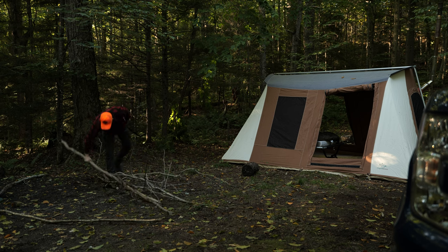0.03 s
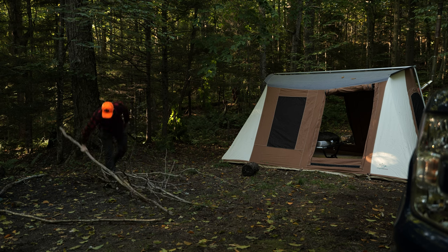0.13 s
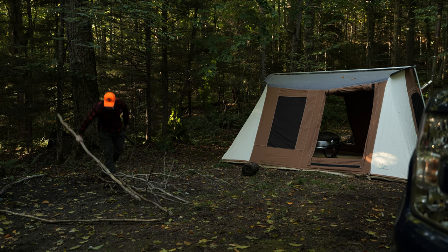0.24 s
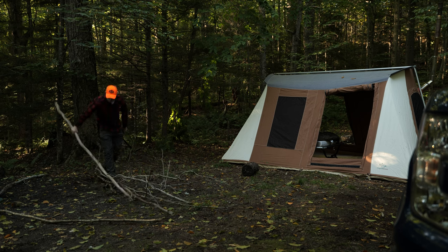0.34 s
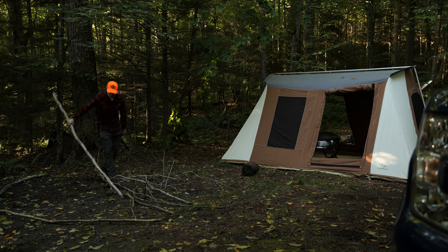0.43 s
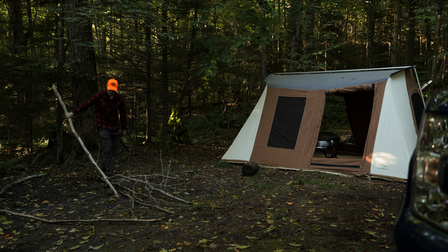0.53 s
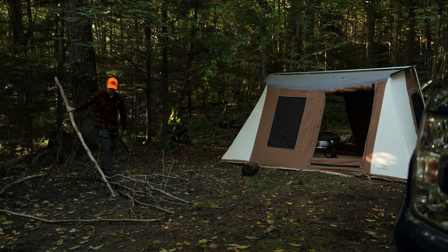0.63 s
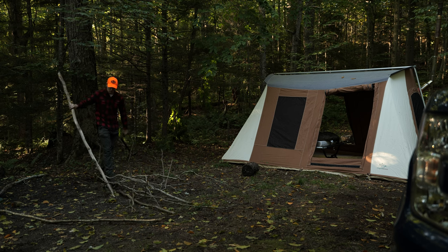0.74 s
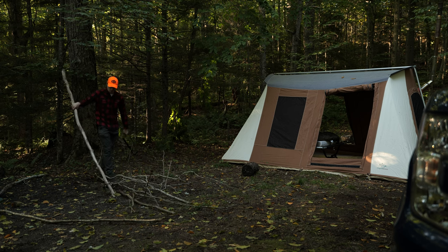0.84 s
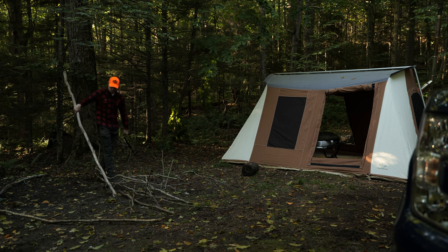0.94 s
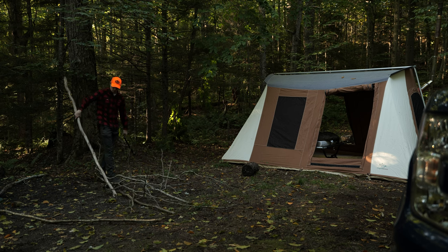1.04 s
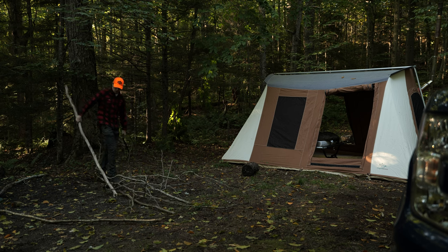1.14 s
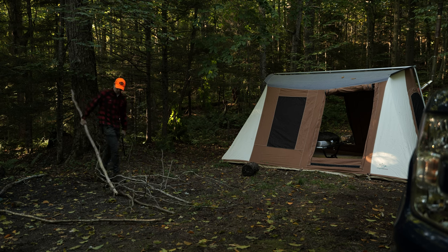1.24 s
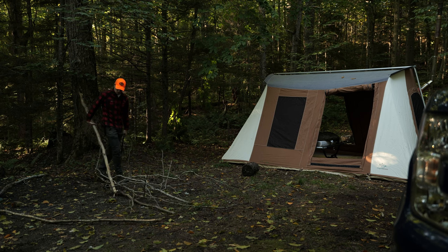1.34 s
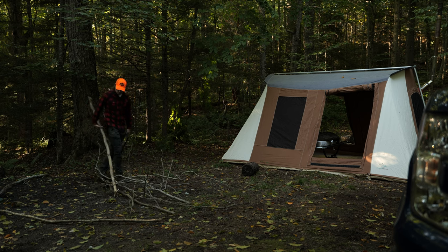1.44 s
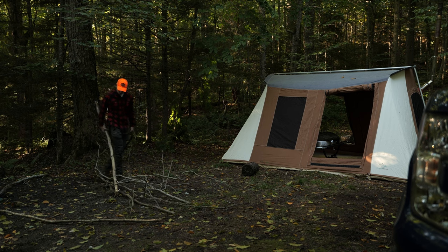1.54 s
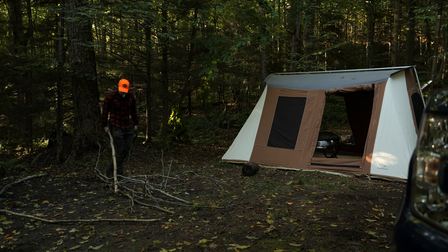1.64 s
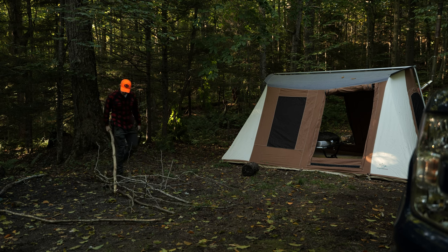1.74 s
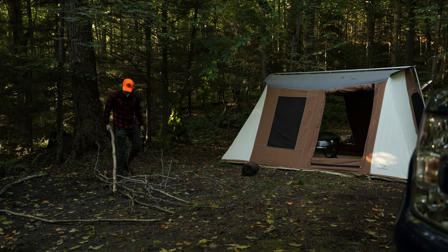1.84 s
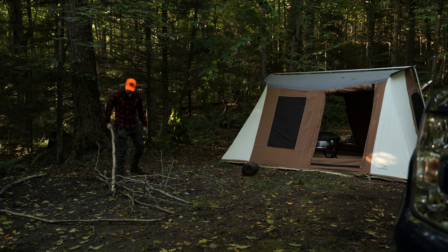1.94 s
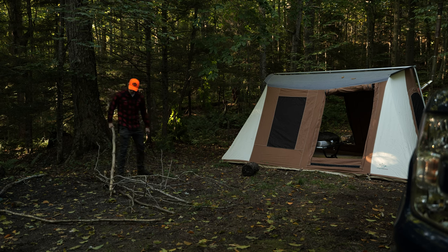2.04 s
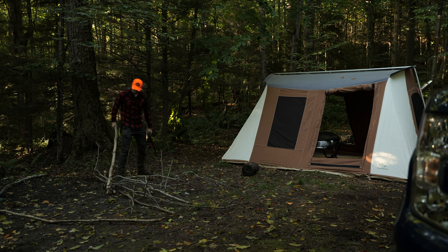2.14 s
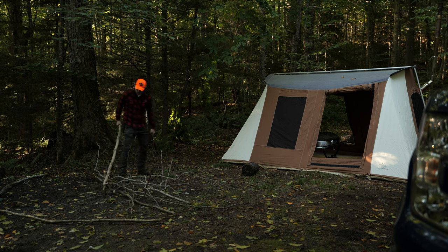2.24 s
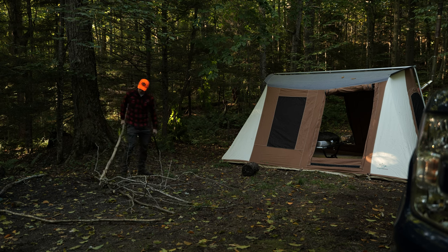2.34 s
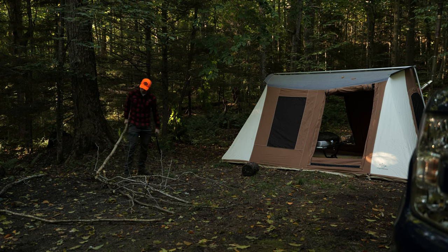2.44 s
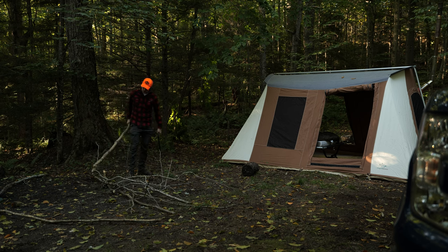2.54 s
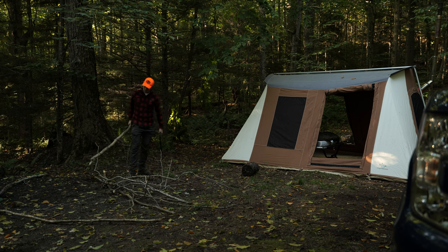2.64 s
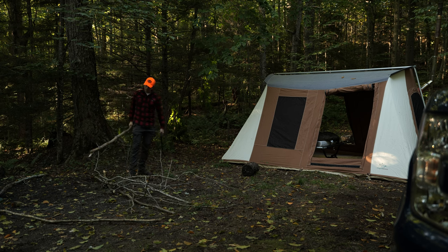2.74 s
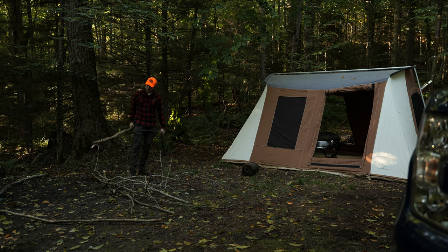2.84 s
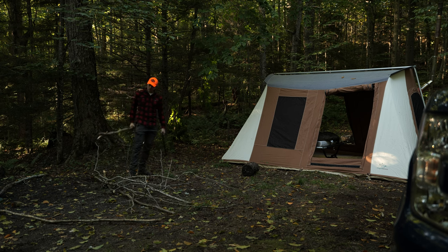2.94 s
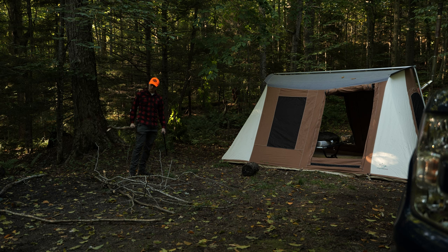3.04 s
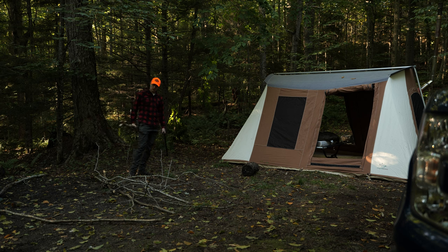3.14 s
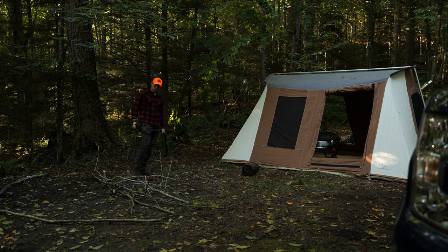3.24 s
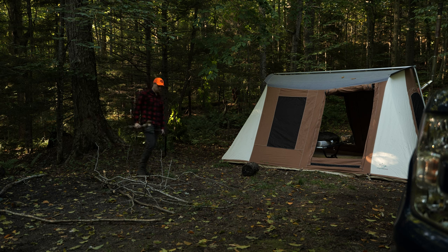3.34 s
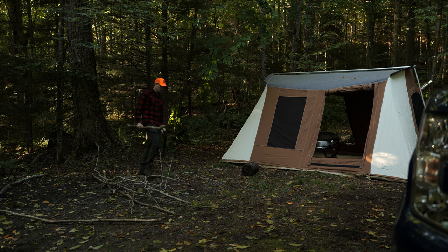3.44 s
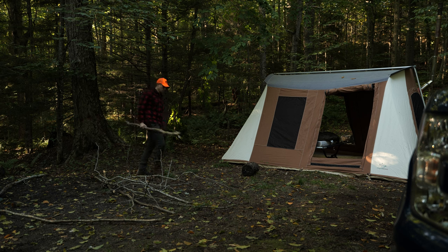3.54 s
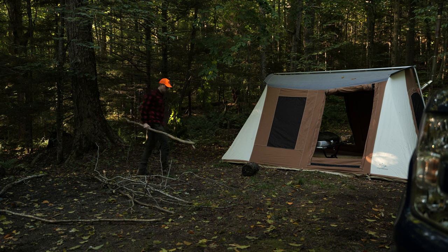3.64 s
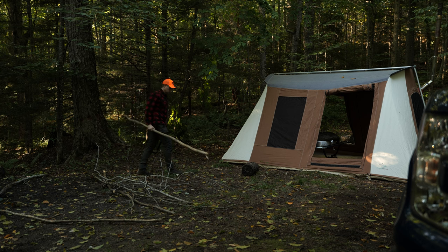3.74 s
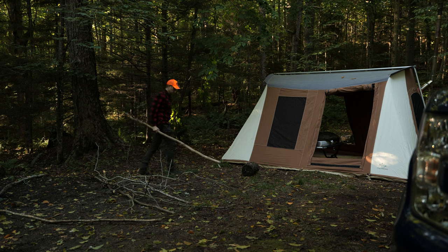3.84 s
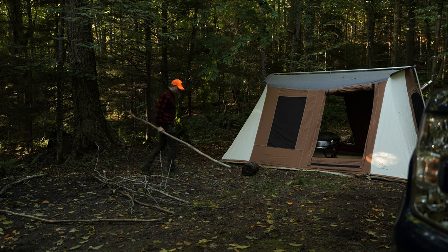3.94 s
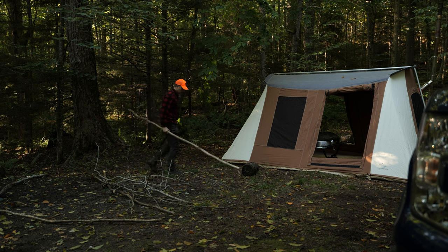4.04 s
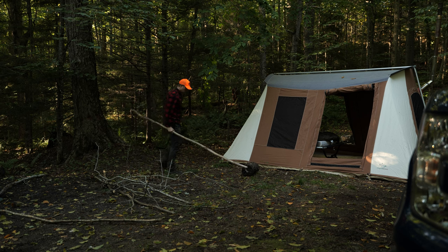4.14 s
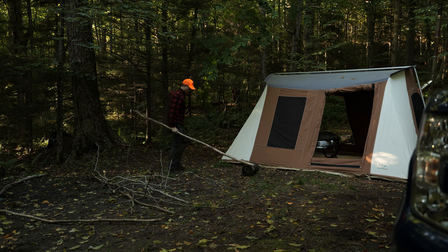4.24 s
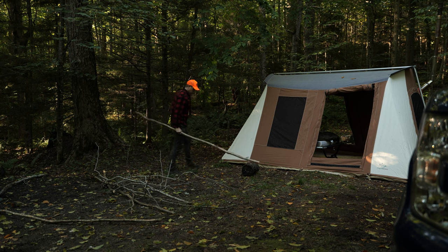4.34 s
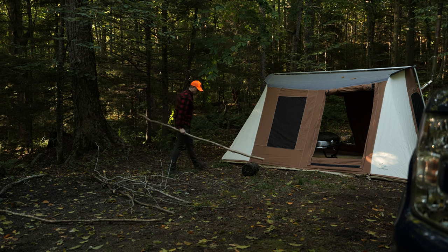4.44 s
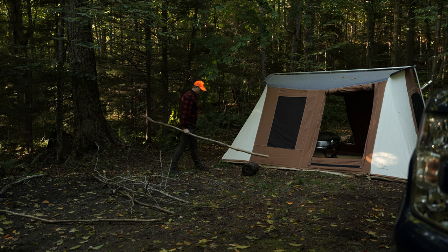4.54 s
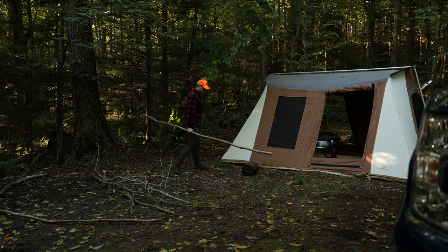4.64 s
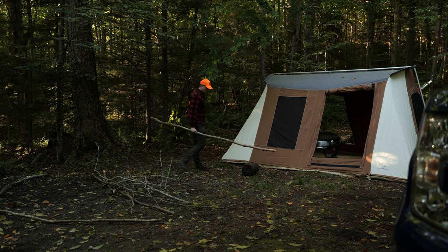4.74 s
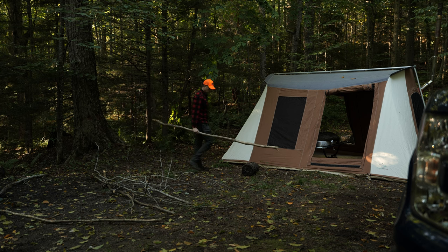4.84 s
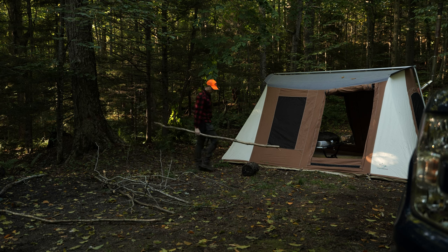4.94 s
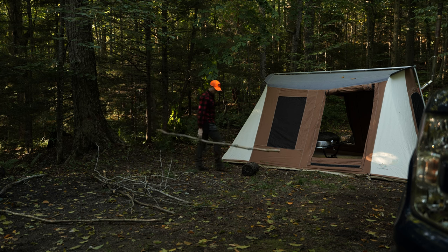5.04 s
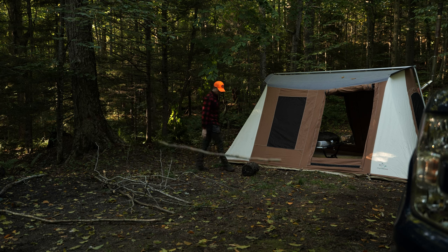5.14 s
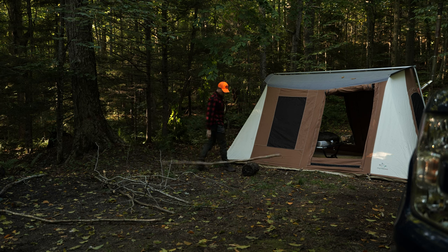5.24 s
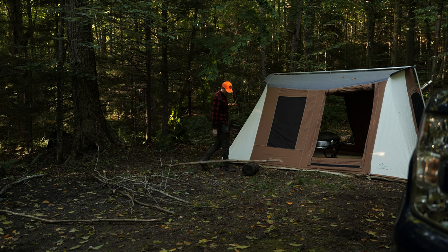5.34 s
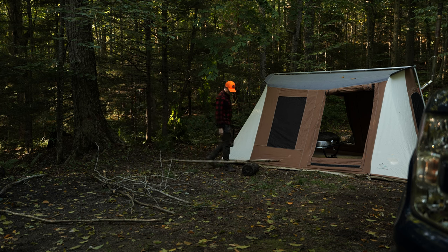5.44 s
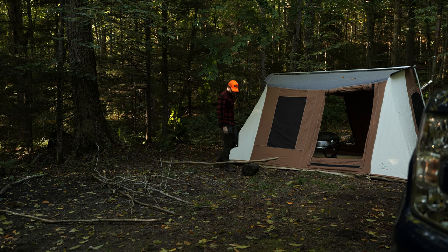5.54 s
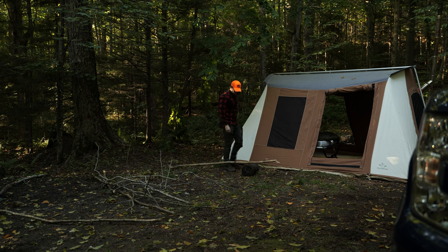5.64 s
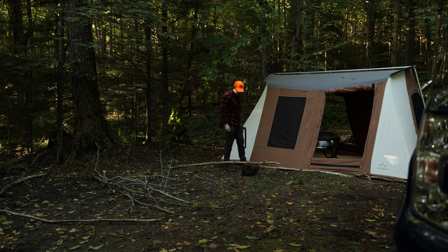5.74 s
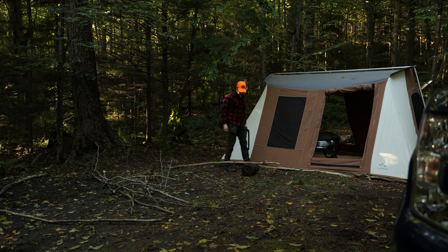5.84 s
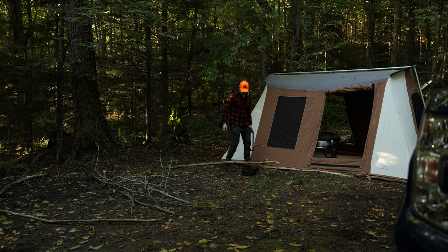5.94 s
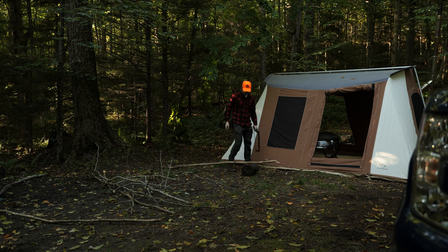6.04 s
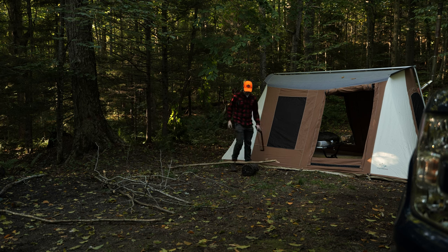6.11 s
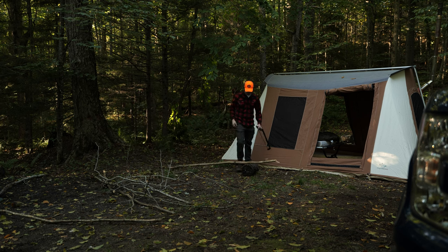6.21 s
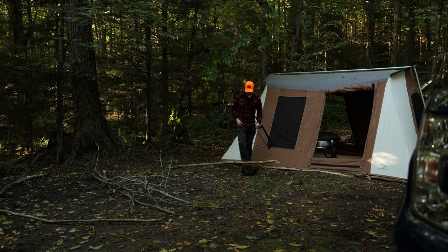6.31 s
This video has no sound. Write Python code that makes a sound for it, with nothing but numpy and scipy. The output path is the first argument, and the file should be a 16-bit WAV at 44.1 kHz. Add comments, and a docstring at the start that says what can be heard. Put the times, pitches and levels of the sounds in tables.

```python
"""Forest floor, several metres away: someone pulls a long dead branch from a pile of sticks and walks off.
Dry leaves crunch under boots and wood, soil scuffs, twigs scrape, snap and knock; the branch judders free.
It is dropped, tip first, then its heavy end thumps on the soil and rattles to rest.
Blows ring the branch and scatter off the trunks. The still forest hushes behind it all."""
import sys
import numpy as np
from scipy import signal
from scipy.fft import rfft, irfft, next_fast_len
from scipy.io import wavfile

SR = 44100
rng = np.random.default_rng(int(sys.argv[2]) if len(sys.argv) > 2 else 0)


def wav_out(sig):
    """Save sig, one row per channel (or a flat mono array), as 16-bit PCM at SR to the path in sys.argv[1]."""
    wavfile.write(sys.argv[1], SR, np.round(np.clip(np.atleast_2d(sig).T, -1, 1) * 32767).astype(np.int16))


N = 281005
TIME = np.arange(N) / SR
FFT_SIZE = 2 * next_fast_len(N // 2 + 8192)


def from_db(db):
    return 10 ** (np.asarray(db) / 20)


def unit_rms(x):
    return x / np.sqrt(np.mean(x ** 2) + 1e-20)


def bin_gains(spectrum):
    """Rows of f/Hz, level/dB as gains at the FFT bins."""
    hz, db = np.transpose(spectrum)
    bin_hz = np.maximum(np.arange(FFT_SIZE // 2 + 1) * SR / FFT_SIZE, 1)
    return from_db(np.interp(np.log(bin_hz), np.log(hz), db))


def colour(x, spectrum):
    """Minimum-phase filter; white noise keeps its power."""
    cepstrum = irfft(np.log(unit_rms(bin_gains(spectrum))))
    cepstrum[1:FFT_SIZE // 2] *= 2
    cepstrum[FFT_SIZE // 2 + 1:] = 0
    return irfft(rfft(x, FFT_SIZE) * np.exp(rfft(cepstrum)))[:N]


def drift(rate_hz):
    """Straight lines between Gaussian random values."""
    knots = rng.standard_normal(4096)
    return np.interp(TIME * rate_hz, np.arange(len(knots)), knots)


def ring(x, hz, t60_s):
    """Resonator, peak gain 1, zero at DC."""
    r, w = from_db(-60 / (t60_s * SR)), 2 * np.pi * hz / SR
    return signal.lfilter(np.array([1, 0, -1]) * (1 - r * r) / 2, [1, -2 * r * np.cos(w), r * r], x + 1e-18)


def grains(per_s, spread_db):
    """Random clicks, many small, few large; unit power."""
    sizes = from_db(spread_db * np.minimum(rng.exponential(1, N), 4)) * rng.choice([-1, 1], N)
    return unit_rms(sizes * (rng.random(N) < per_s / SR))


def add(track, at_s, sound):
    start = int(at_s * SR)
    track[start:start + len(sound)] += sound[:N - start]


def with_pushes(steady_db, pushes, release_ratio=1.15):
    """Steady level plus pushes that build and ease off more slowly; power sum in dB."""
    power = from_db(steady_db) ** 2
    for peak_s, db, swell_s in pushes:
        width_s = np.where(TIME < peak_s, swell_s, release_ratio * swell_s)
        power += from_db(db) ** 2 * np.exp(-np.minimum(((TIME - peak_s) / width_s) ** 2 / 2, 50))
    return 10 * np.log10(power)


def forest_hush(level_db=-64):
    """Steady, dark noise of the still forest."""
    spectrum = [(20, -31), (35, -6), (60, -7), (115, -2.5), (200, -4), (500, -4), (1000, -9), (1800, -14.5),
                (2600, -17), (3550, -14.5), (4700, -19), (8000, -25), (16000, -24)]  # f/Hz, density/dB
    return from_db(level_db) * unit_rms(colour(rng.standard_normal(N), spectrum))


def leaves(drive_db, body_db, crisp_db=-5.5, body_hz=5000):
    """Leaves crumple in clumps of tiny fractures over a swish; stiff ones crack at their own pitch."""
    spectrum = [(300, -11.5), (900, -5), (2000, -3.5), (2800, 1), (3750, 4), (4600, -6.5), (7000, -6),
                (11000, -8.5), (14500, -10.5), (16000, -17)]  # dry leaves: f/Hz, density/dB
    per_s = 5000 * from_db(.5 * (drive_db + 53))  # more pressure, more fractures
    clumps = from_db(1.9 * drift(85))
    crackle = grains(per_s, spread_db=3.1)
    cracks = grains(.12 * per_s, spread_db=2.4)
    pitches_hz = np.geomspace(1600, 14000, 14)
    pitch_index = rng.integers(0, len(pitches_hz), N)
    crisp = sum(unit_rms(ring(cracks * (pitch_index == k), hz, 9 / hz)) * np.sqrt(hz)
                for k, hz in enumerate(pitches_hz))
    crunch = clumps * (crackle + from_db(crisp_db) * unit_rms(crisp))
    swish = rng.standard_normal(N)
    rustle = unit_rms(colour(crunch + swish, spectrum))
    body = signal.sosfiltfilt(signal.butter(2, body_hz, fs=SR, output="sos"), rustle)
    return from_db(drive_db + 3) * (rustle + (from_db(body_db) - 1) * body)


def twig_scraping(drive_db):
    """Bark sticks and slips on twigs; each slip rings their modes at random strengths."""
    stick_modes = [(643, -1.5, 0.032), (795, 0.5, 0.11), (935, 1.5, 0.029), (1038, -0.5, 0.026),
                   (1178, -0.5, 0.019), (1373, -4, 0.019), (1650, -6.5, 0.012), (2014, -3.5, 0.0063),
                   (2590, -7, 0.017)]  # thin dry sticks: f/Hz, level/dB, t60/s
    slips = grains(1600, spread_db=2.0) * from_db(1.8 * drift(60))
    rings = sum(from_db(db + 2 * drift(9)) * ring(slips * rng.standard_normal(N), hz, t60_s)
                for hz, db, t60_s in stick_modes)
    return from_db(drive_db - 3.8) * unit_rms(rings)


def soil_scuffing(drive_db):
    """Boots and wood push through loose soil."""
    spectrum = [(30, -15), (60, -44), (105, -1), (150, -0.5), (280, 2.5), (480, -1), (700, -0.5),
                (1300, -14.5), (4000, -79)]  # soil grains: f/Hz, density/dB
    return from_db(drive_db - 2.0) * unit_rms(colour(grains(1500, spread_db=3.5), spectrum))


def litter(haul_db=-52):
    """One stir drives leaves, twigs and soil; crunches and scrapes swell out of it."""
    stir = [(0, -52.5), (.2, -52.5), (.45, -52), (.66, -51), (.82, -58), (1.08, -57), (1.13, -63.5),
            (1.5, -63.5), (2.1, -58.5), (2.68, -63.5), (2.85, -68), (3.25, -68), (3.7, -63), (5.4, -64.5),
            (6.15, -64), (6.37, -67)]  # leaves, loud in the haul, faint in the carry: t/s, level/dB
    # boot or branch presses down: peak t/s, leaf level/dB, swell/s, soil/dB re leaf, body/dB re leaf
    crunches = [(0.229, -46, 0.0096, -7, -12), (.315, -45.5, 0.027, -1.5, 0), (0.394, -44.5, 0.021, -2, -1),
                (.565, -64, 0.022, 19.5, -1), (1.416, -60.5, 0.044, -3, 4.5), (1.6, -57, 0.038, -10, -2.5),
                (1.735, -56, 0.034, -8, -1), (1.97, -53, 0.017, -3.5, -9), (2.125, -50.5, 0.026, -4, -3.5),
                (2.295, -58, 0.017, 0, 6), (2.631, -60, 0.044, 1.5, 3.5), (3.406, -55, 0.031, -10, -4.5),
                (3.78, -56, 0.052, -3.5, -4), (4.397, -54.5, 0.012, 2.5, -4), (4.479, -48, 0.031, -7.5, -6),
                (4.64, -61.5, 0.046, 0, -5), (4.895, -58, .015, -20, -19), (5.075, -59.5, 0.027, -18, -11),
                (5.182, -61.5, 0.017, -2, 8), (5.438, -55, 0.014, 8, -11), (5.714, -53.5, 0.014, -2, 0),
                (5.805, -57, 0.01, -1, -2.5)]
    scrapes = [(.345, -52, 0.03), (.905, -50, 0.011), (1.085, -50, 0.0082), (1.209, -56, 0.02),
               (1.41, -52, 0.009), (1.6, -52, 0.026), (1.735, -44.5, 0.021), (1.885, -53, .015),
               (2.12, -51, 0.036), (2.295, -43, 0.01), (4.22, -58.5, 0.034), (4.4, -46.5, 0.012),
               (4.5, -48.5, 0.0086), (5.33, -47, 0.025), (5.435, -42, 0.02), (5.61, -55, 0.035)]  # bark slides over a stick: peak t/s, level/dB, swell/s
    stir_db = np.interp(TIME, *np.transpose(stir))
    effort_db = stir_db - haul_db
    peak_s, push_db, swell_s, soil_rel_db, body_rel_db = np.transpose(crunches)
    leaf_db = with_pushes(stir_db, zip(peak_s, push_db, swell_s))
    body_db = with_pushes(stir_db, zip(peak_s, push_db + body_rel_db, swell_s))
    soil_db = with_pushes(-55.5 + 0.99 * effort_db, zip(peak_s, push_db + soil_rel_db, swell_s))
    twig_db = with_pushes(-45.5 + 1.486 * effort_db, scrapes)
    return leaves(leaf_db, body_db - leaf_db) + twig_scraping(twig_db) + soil_scuffing(soil_db)


def snaps(tick_db=-10, first_crack=8, ring_cycles=8):
    """Dry fibres part with one sharp crack and a short burst of smaller ones."""
    breaks = [(.01, -26, 0.001, 3380), (.298, -25.5, 0.011, 2850), (0.92, -30, 0.0055, 3500),
              (1.042, -37.5, 0.007, 4700), (1.179, -40.5, .009, 3340), (1.676, -36, 0.0042, 6900),
              (1.734, -27.5, 0.014, 3060), (1.885, -35, 0.012, 2950), (1.9322, -28.5, .0006, 12500),
              (1.966, -35, .014, 3400), (2.081, -35, .0016, 7000), (2.354, -30, .0012, 12000),
              (2.402, -33.5, .0009, 3300), (2.9088, -41, .001, 3800), (3.132, -45, .001, 4000),
              (3.738, -41, .006, 3400), (3.87, -38.5, .004, 3900), (4.376, -38, .014, 3400),
              (4.465, -33, .0036, 6200), (4.497, -28, .0013, 7260), (5.299, -32, 0.0011, 11000),
              (5.3814, -39, 0.0048, 7200), (5.3821, -16, 0.0036, 3600), (5.429, -33, 0.0026, 6500),
              (5.442, -28, .004, 5600), (5.721, -28.5, .006, 2920), (5.8855, -35.5, .0006, 13100)]  # twigs and leaves: t/s, peak level/dB, decay/s, f/Hz
    track, t = np.zeros(N), TIME[:SR // 10]
    for at_s, db, decay_s, hz in breaks:
        cracks = rng.laplace(0, 1, len(t)) * np.exp(-t / decay_s) + first_crack * (t == 0)
        burst = unit_rms(ring(cracks, hz, ring_cycles / hz)) + from_db(tick_db) * unit_rms(cracks)
        add(track, at_s, from_db(db) * burst / np.abs(burst).max())
    return track


def branch_ring(blows):
    """The long dry limb rings on faintly after each blow."""
    modes = [(61.5, 7.5, 1), (97.6, -2, 0.45), (182.6, -10, 0.75), (300, -16, 0.2), (450, -7.5, 0.11),
             (655, -24, 0.3), (762, 0, 0.042), (1100, 0, 0.25), (1210, -6, 0.12), (1440, 3, 0.38),
             (2560, -25, 0.17), (3760, -29, 0.18)]  # f/Hz, gain/dB, t60/s
    return sum(from_db(db) * ring(blows, hz, t60_s) for hz, db, t60_s in modes)


def trunk_echoes(blows, near_db=-11.5, near_t60_s=0.27, far_db=-17.5, far_t60_s=0.68):
    """Near trunks scatter the sound at once; the deeper forest returns a faint long tail."""
    spectrum = [(20, -17), (45, 4), (62, 5), (100, 0.5), (160, -1.5), (250, -7.5), (600, -2), (1300, -5),
                (3500, 3.5), (6000, 6), (16000, -7.5)]  # f/Hz, relative gain/dB
    near = rng.standard_normal(N) * from_db(-60 * TIME / near_t60_s) * (TIME > .006)
    far = rng.standard_normal(N) * from_db(-60 * TIME / far_t60_s) * (1 - np.exp(-TIME / 0.037))
    response = (from_db(near_db) * unit_rms(near) + from_db(far_db) * unit_rms(far)) / np.sqrt(N)
    return colour(signal.fftconvolve(blows, response[:2 * SR])[:N], spectrum)


def thumps():
    """Low bending waves build last, so each thump sinks in pitch before the soil smothers it."""
    landings = [(0.032, -32.5, 0.0063), (0.52, -27, 0.0054), (1.733, -46.5, 0.0018), (2.356, -46, 0.00087),
                (5.3821, -16, 0.0017), (5.718, -21, 0.0067), (5.785, -43, 0.0071), (5.825, -34.5, 0.007)]  # weight on soil: t/s, level/dB, contact/s
    modes = [(59, -27, 0.022), (102.6, -10.5, 0.018), (188.4, -9.5, 0.014), (252, -5.5, 0.0044),
             (290, -1, 0.0033), (463, -11.5, 0.0065)]  # heavy limb on soft ground: f/Hz, level/dB, swell/s
    track, t = np.zeros(N), TIME[:SR // 3]
    for at_s, db, contact_s in landings:
        for hz, mode_db, swell_s in modes:
            rolloff = 1 / np.sqrt(1 + (2 * hz * contact_s) ** 4 / 2)  # soft landing: low modes only
            envelope = t / swell_s * np.exp((1 - (t / swell_s) ** 2) / 2)
            add(track, at_s, from_db(db + mode_db) * rolloff * envelope * np.sin(2 * np.pi * hz * t))
    return track


def knocks(ring_cycles=2.15, chatter_db=-5.5, body_db=-8.5):
    """A blow rings the stick; bark chatters and splinters, and the whole length answers lower down."""
    # wood on wood or ground: t/s, level/dB, f/Hz, chatter decay/s, splintering/dB re knock
    strikes = [(0.26, -34, 239, .0015, -18), (0.2723, -23.5, 1070, .003, -21),
               (0.2776, -17, 1026, 0.0047, -34), (0.496, -37.5, 450, 0.0073, -13),
               (0.521, -27.5, 865, 0.0086, -10), (0.527, -28, 580, 0.01, -12),
               (.8615, -35, 956, 0.0091, -15), (.896, -37, 948, 0.0099, -3),
               (1.674, -36.5, 1695, 0.016, -4.5), (1.677, -41.5, 826, 0.021, -17),
               (1.688, -34, 1650, 0.0061, -10), (2.043, -32.5, 542, 0.0014, -23),
               (2.157, -45, 660, 0.0028, 5), (2.3534, -28, 1680, .0025, 0),
               (2.3564, -31, 1050, 0.0089, -25), (3.631, -42, 466, 0.0026, -25),
               (3.653, -42.5, 327, .0015, -17), (3.671, -48.5, 440, 0.0017, -25),
               (3.787, -42.5, 320, 0.0024, -6), (4.1838, -31, 1225, 0.0019, -6),
               (4.1995, -35.5, 1220, 0.0021, 0), (4.42, -36.5, 496, 0.0041, -9),
               (5.2847, -19, 605, 0.0054, -10), (5.322, -35.5, 1350, 0.01, -1),
               (5.35, -38, 1450, .0055, -8), (5.427, -28, 496, 0.0038, -5),
               (5.4403, -32.5, 443, 0.0039, -3), (5.59, -35.5, 467, 0.0093, -4),
               (5.901, -51.5, 450, .0083, -13)]
    partials = [(.45, -15.5), (1.001, 3.5), (1.228, -5), (1.7, -10)]  # struck stick: frequency ratio, level/dB
    splinter_spectrum = [(40, -9), (200, -14), (900, -24), (1800, 6), (3600, 11), (4600, -10), (7000, -3),
                         (11000, -12.5), (16000, -8)]  # f/Hz, density/dB
    wood, splinters, t = np.zeros(N), np.zeros(N), TIME[:SR // 6]
    for at_s, db, hz, decay_s, splinter_db in strikes + judder():
        envelope = np.exp(-t / decay_s) * (1 - np.exp(-t / 0.00018))
        contacts, bark = rng.standard_normal((2, len(t))) * envelope
        t60_s = ring_cycles / hz + 4.16 * decay_s  # a freer stick chatters and rings longer
        tone = sum(from_db(partial_db) * np.sin(2 * np.pi * (hz * ratio * t + rng.random()))
                   for ratio, partial_db in partials)
        blow = tone * from_db(-60 * t / t60_s) * (1 - np.exp(-t * hz))
        chatter = ring(contacts, hz, ring_cycles / hz)
        bending = rng.standard_normal(len(t)) * t * np.exp(-t / decay_s)  # slow waves, late peak
        body = signal.sosfilt(signal.butter(2, [hz / 4, hz * 1.28], "band", fs=SR, output="sos"), bending)
        for part, part_db in ((blow, 0), (chatter, chatter_db), (body, body_db)):
            add(wood, at_s, from_db(db + part_db) * part / np.abs(part).max())
        add(splinters, at_s, from_db(db + splinter_db) * bark)
    return wood + colour(splinters, splinter_spectrum)


def judder(start_s=.298, period_s=.0272, count=5, centre_hz=1080, spread_oct=.14):
    """The hauled branch catches and slips almost regularly; one knock row per catch."""
    level_db, decay_s, splinter_db = -27, .01, -16
    catches = []
    for k, (lag, grip) in enumerate(rng.normal(0, 1, (count, 2))):
        at_s = start_s + period_s * (k + .05 * lag)
        hz = centre_hz * 2 ** (spread_oct * grip)  # new grip point, new pitch
        catches.append((at_s, level_db, hz, decay_s, splinter_db))
    return catches


def stereo(mid, diffuse_db=-70):
    """Action central, some treble scattered sideways; diffuse hush from all around."""
    width = [(100, -38), (1000, -31), (3000, -25.5), (5500, -17), (10000, -15), (15000, -14.5)]  # f/Hz, side re mid/dB
    diffuse_spectrum = [(18, -51), (30, -1), (134, -3), (499, -3), (600, -4), (4780, -10), (16000, -7)]  # hush: f/Hz, density/dB
    scatter = rfft(rng.standard_normal(N) * np.exp(-TIME / .012), FFT_SIZE)
    side = irfft(rfft(mid, FFT_SIZE) * scatter / np.abs(scatter) * bin_gains(width))[:N]
    side += from_db(diffuse_db) * unit_rms(colour(rng.standard_normal(N), diffuse_spectrum))
    return np.array([mid + side, mid - side])


def scene():
    """Branch and boots among the trees, over the hush."""
    rustle = litter()
    blows = knocks() + snaps() + thumps()
    return stereo(forest_hush() + rustle + blows + branch_ring(blows) + trunk_echoes(blows))


def record(dry):
    """Band limit: 40 Hz to 15.9 kHz."""
    dry = signal.sosfilt(signal.butter(2, 40, "high", fs=SR, output="sos"), dry)
    return signal.sosfilt(signal.ellip(10, .2, 70, 15900, fs=SR, output="sos"), dry)


dry = scene()
out = record(dry)
wav_out(out)
```